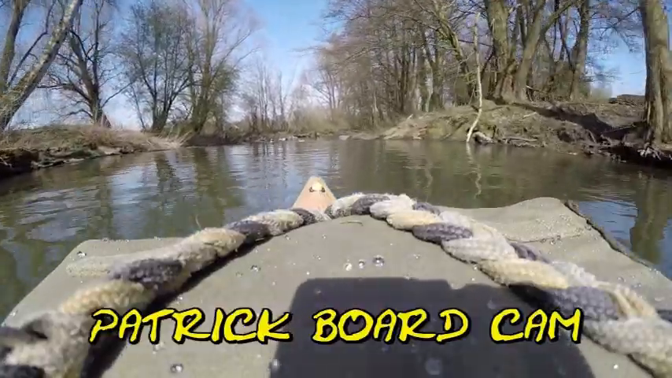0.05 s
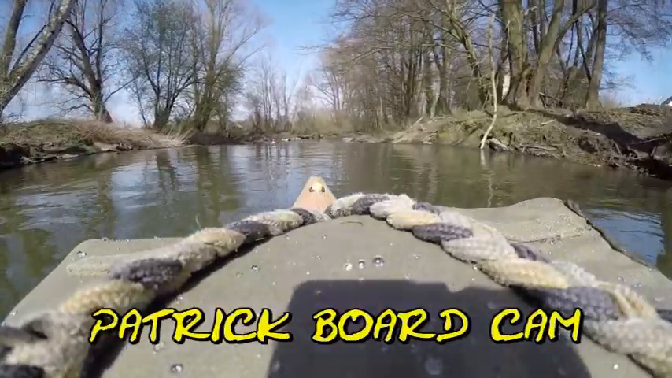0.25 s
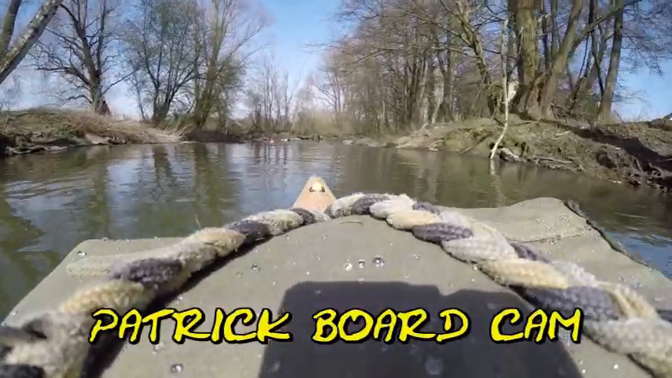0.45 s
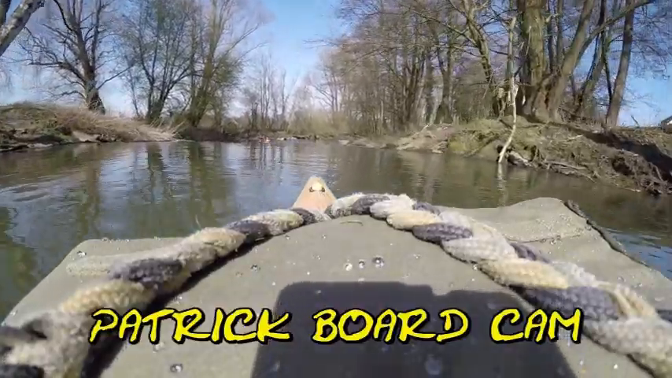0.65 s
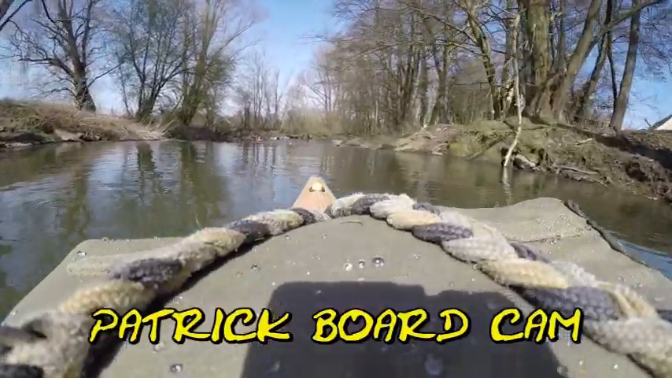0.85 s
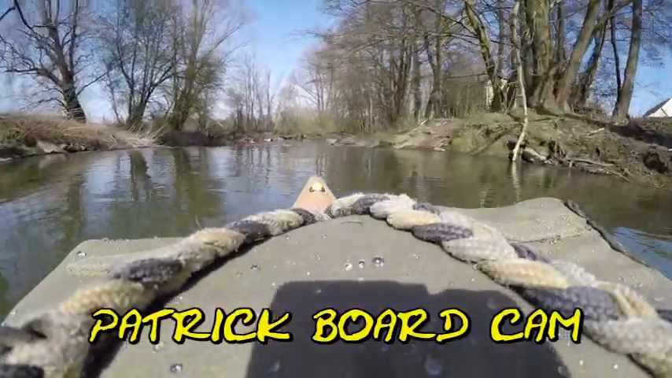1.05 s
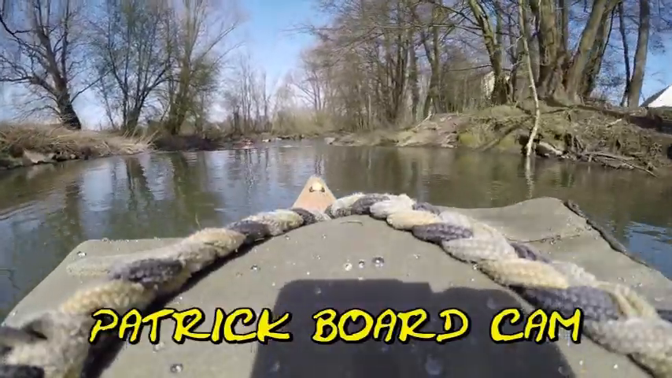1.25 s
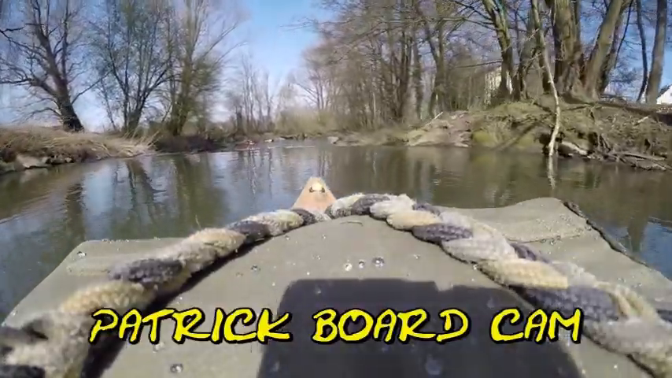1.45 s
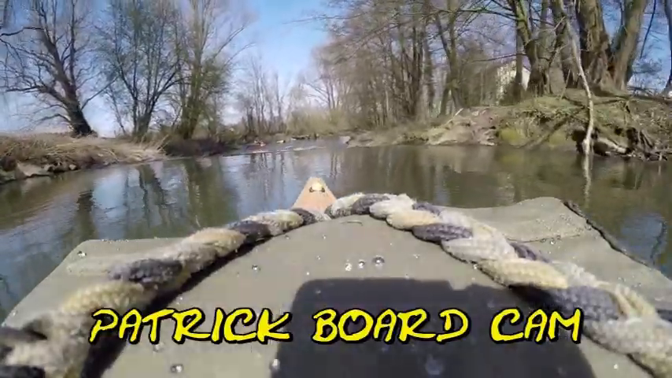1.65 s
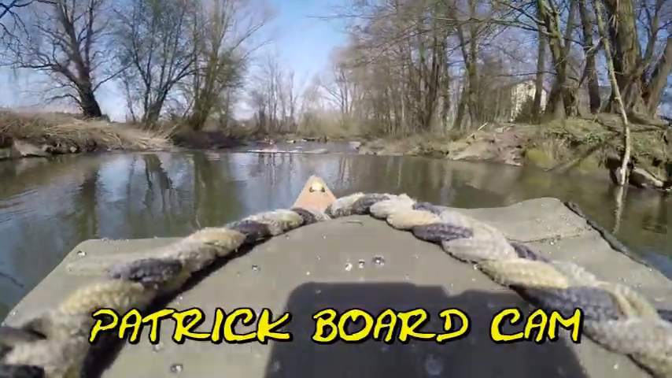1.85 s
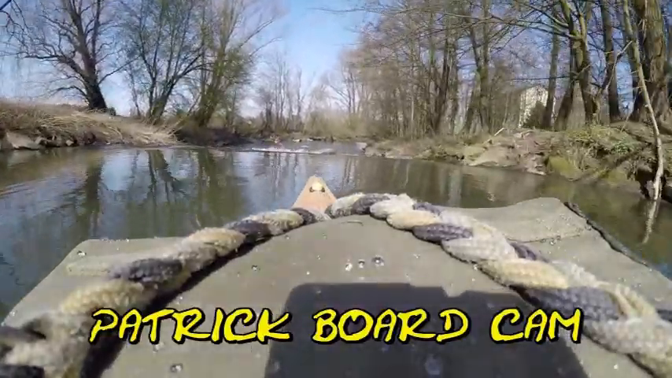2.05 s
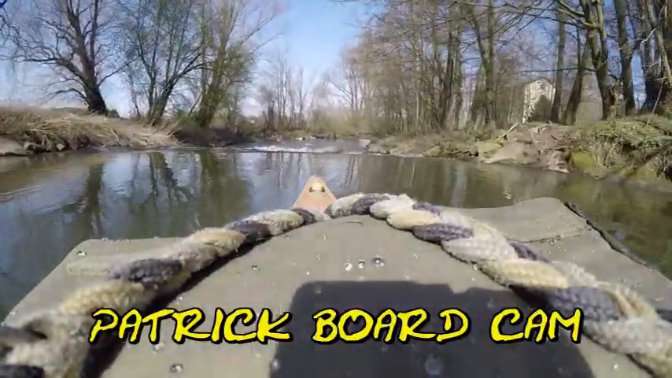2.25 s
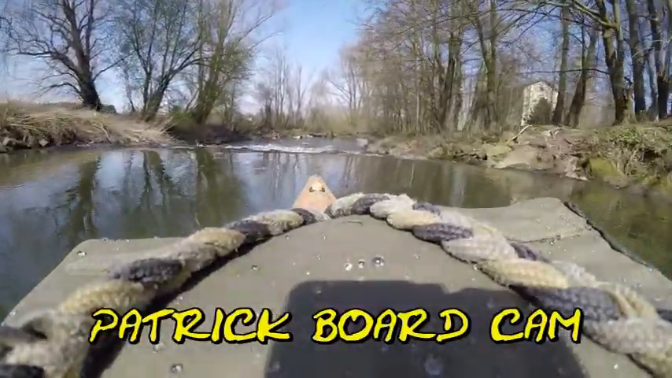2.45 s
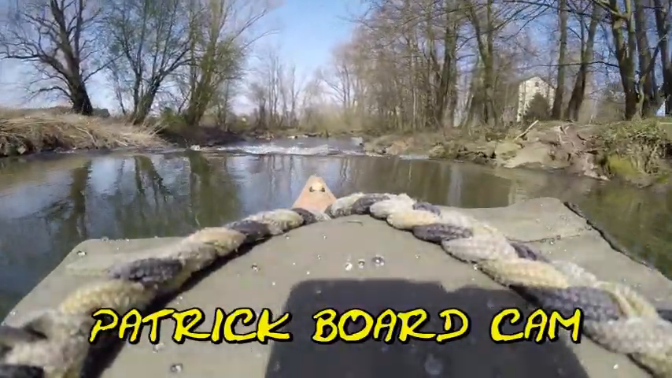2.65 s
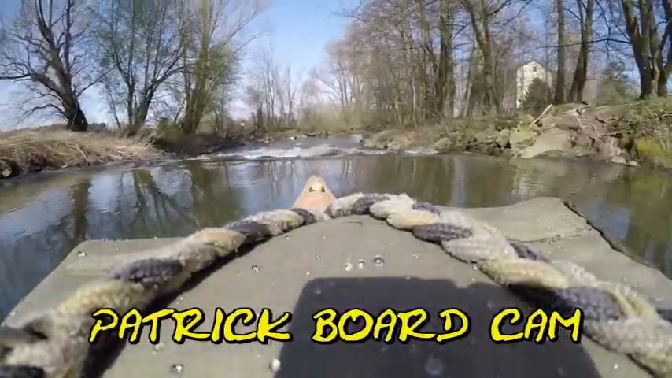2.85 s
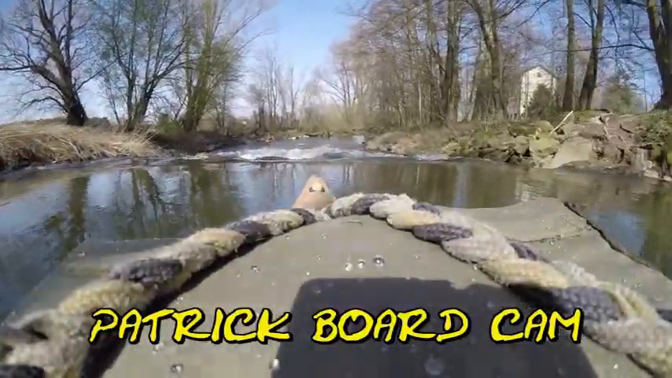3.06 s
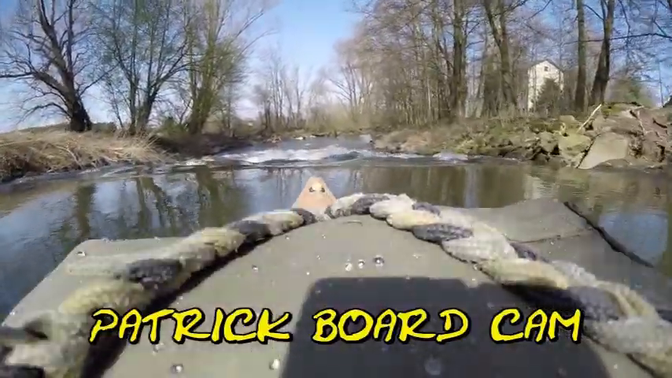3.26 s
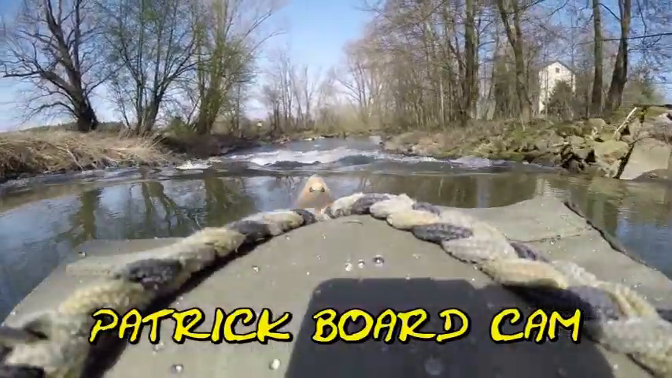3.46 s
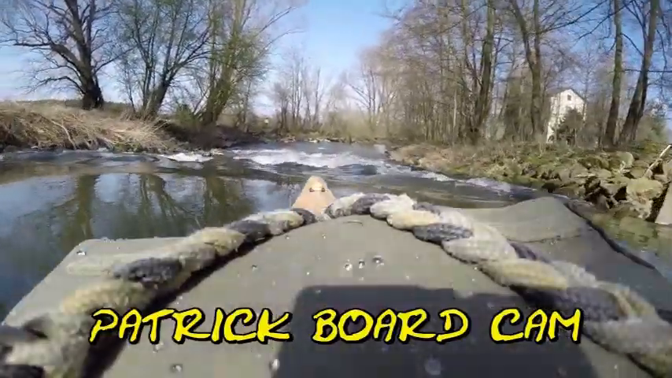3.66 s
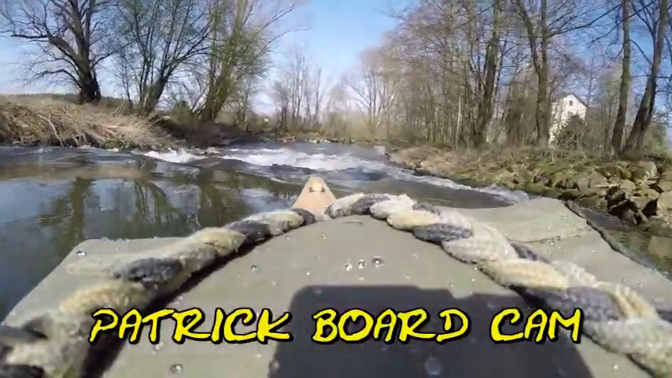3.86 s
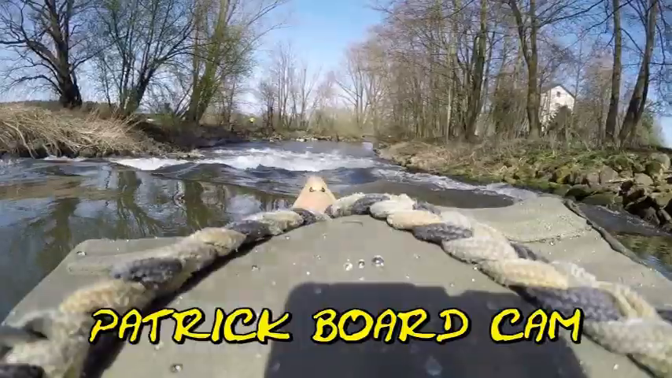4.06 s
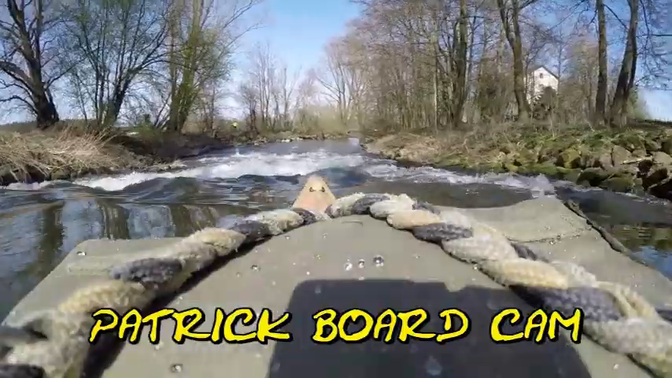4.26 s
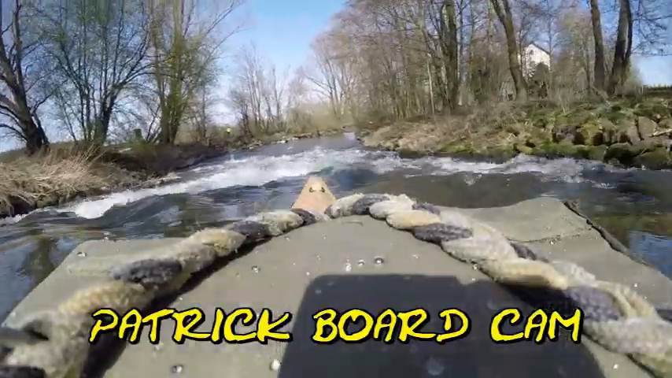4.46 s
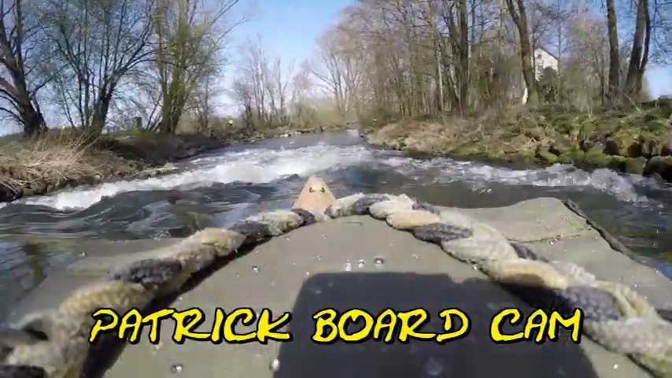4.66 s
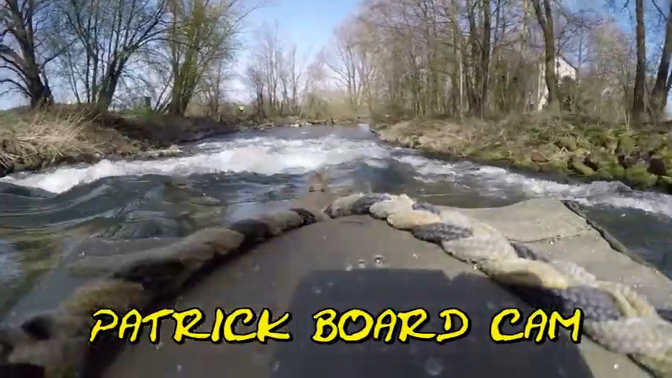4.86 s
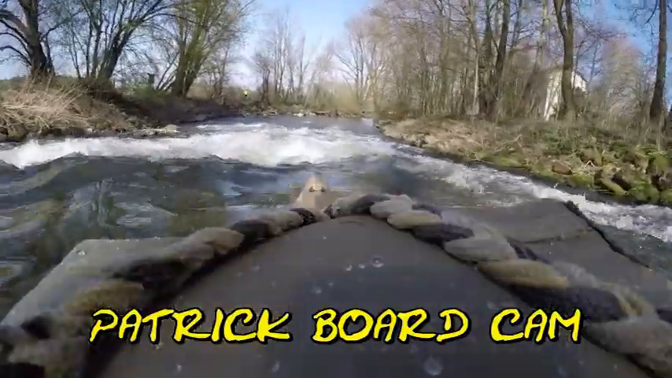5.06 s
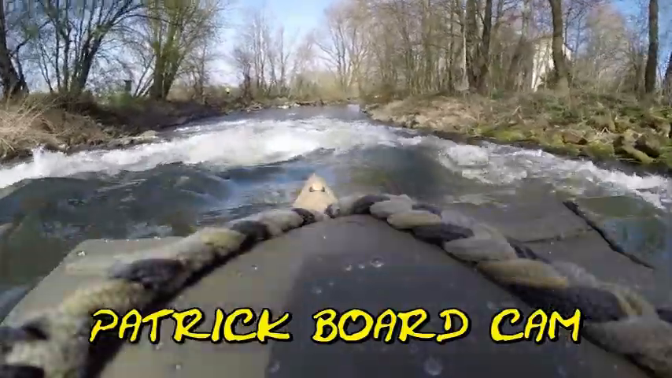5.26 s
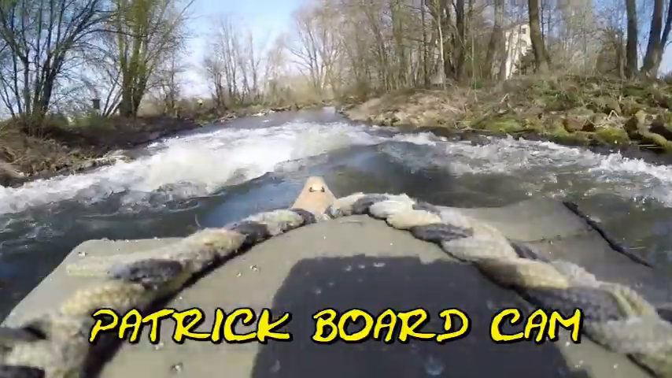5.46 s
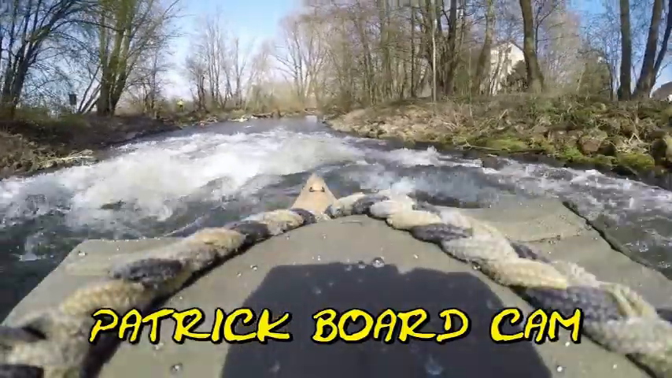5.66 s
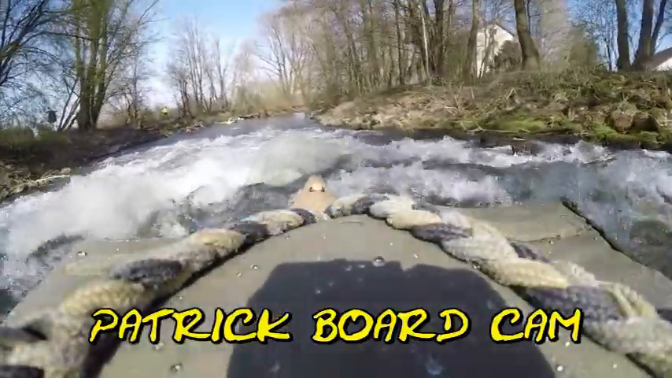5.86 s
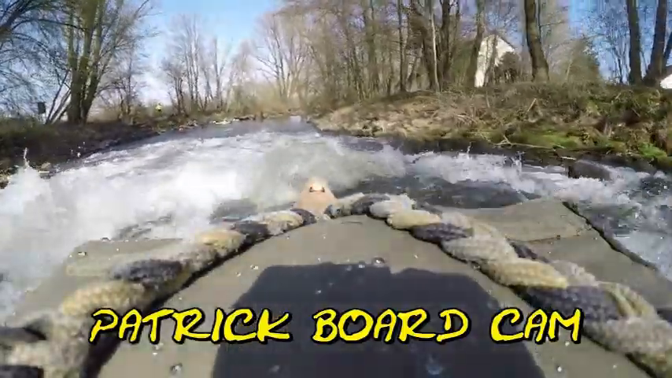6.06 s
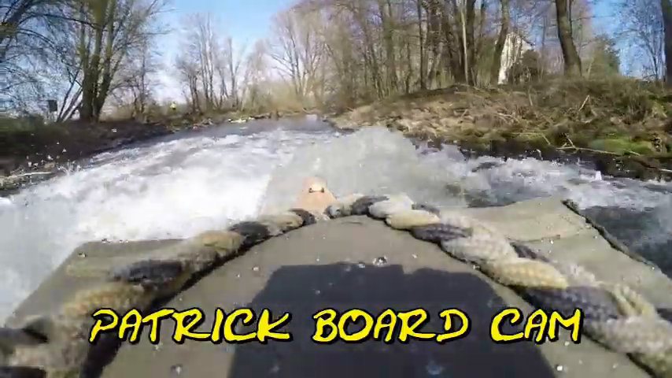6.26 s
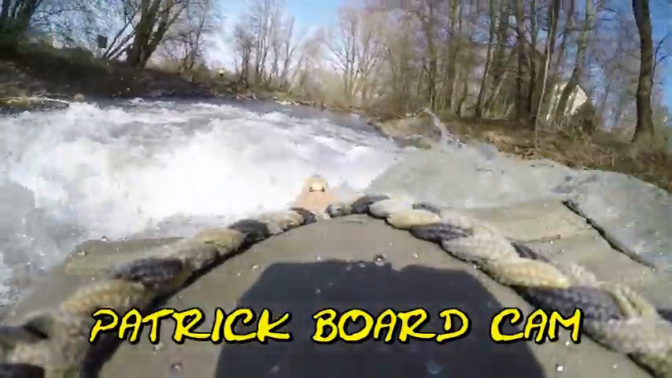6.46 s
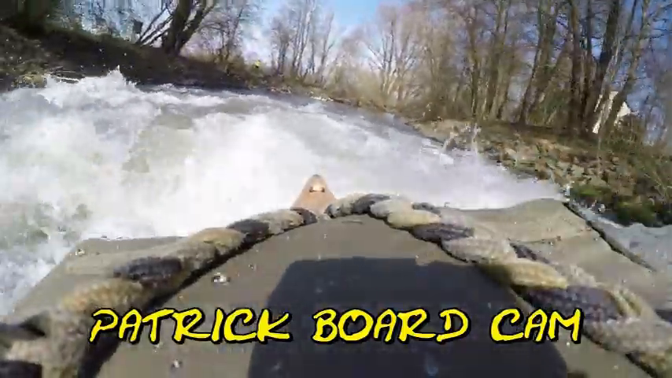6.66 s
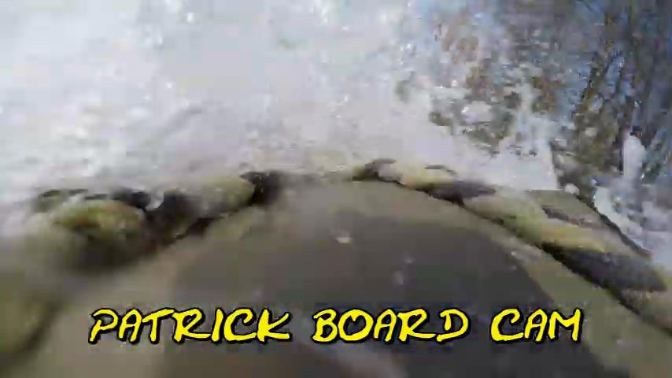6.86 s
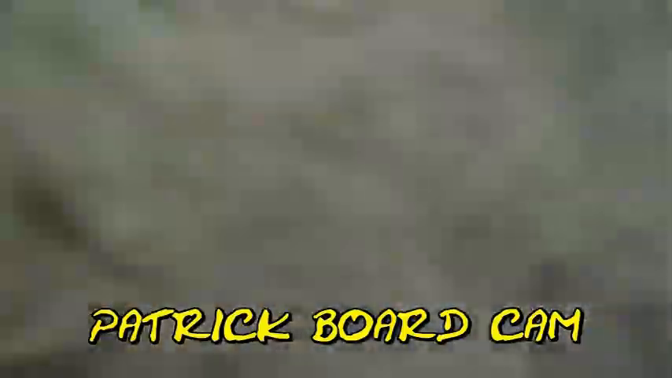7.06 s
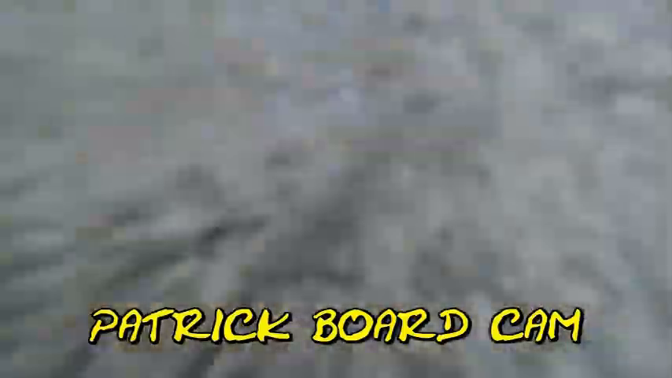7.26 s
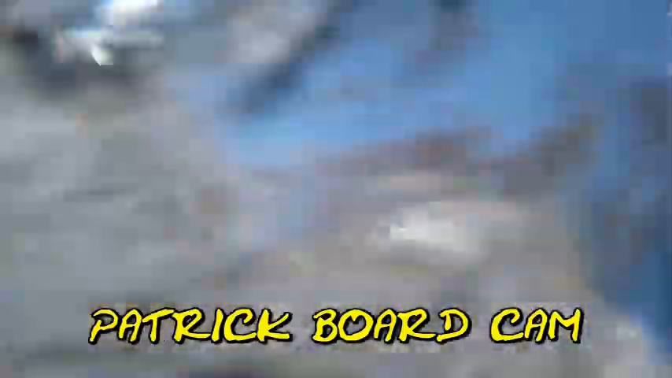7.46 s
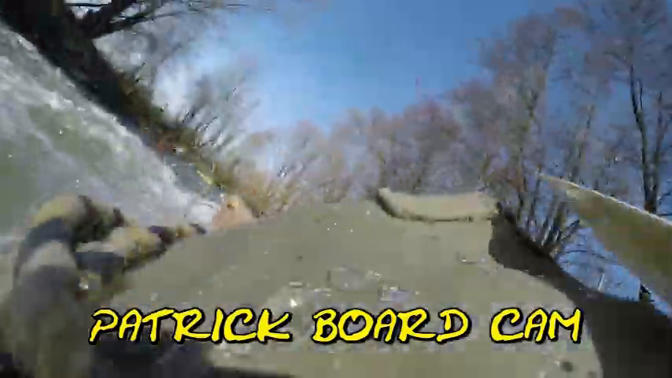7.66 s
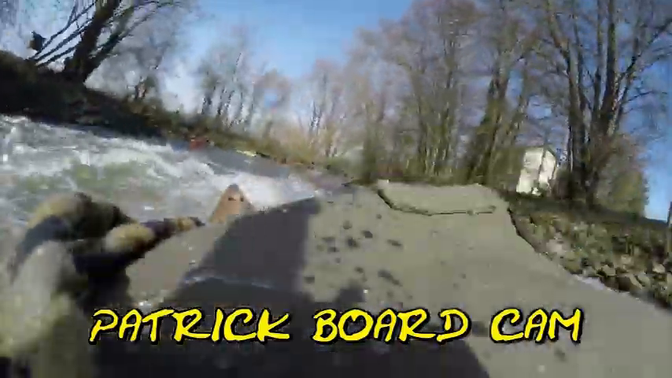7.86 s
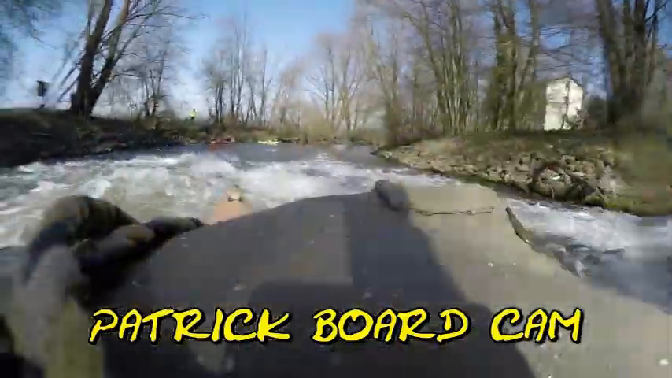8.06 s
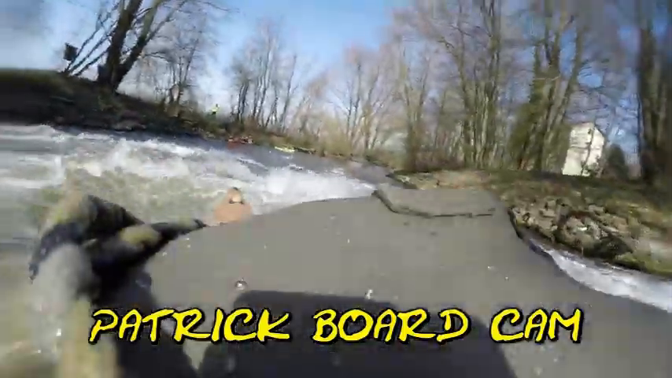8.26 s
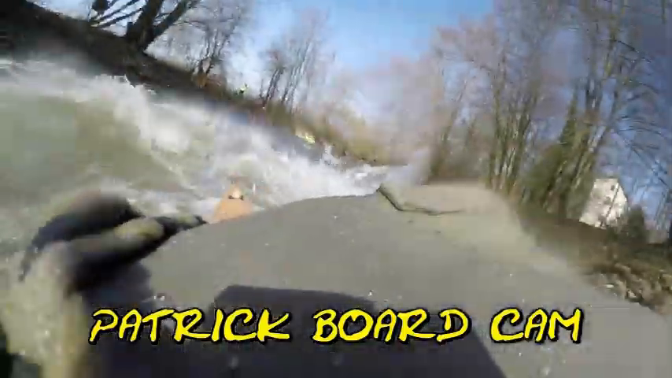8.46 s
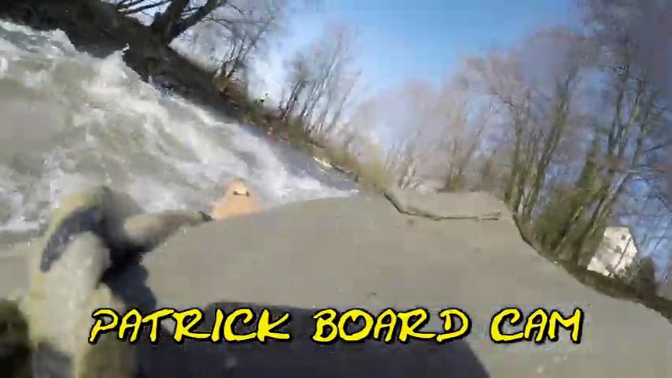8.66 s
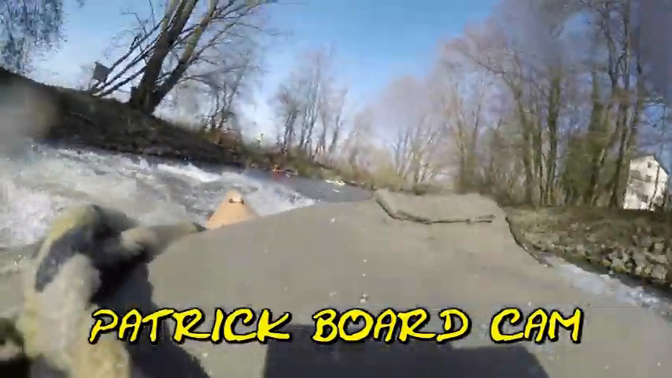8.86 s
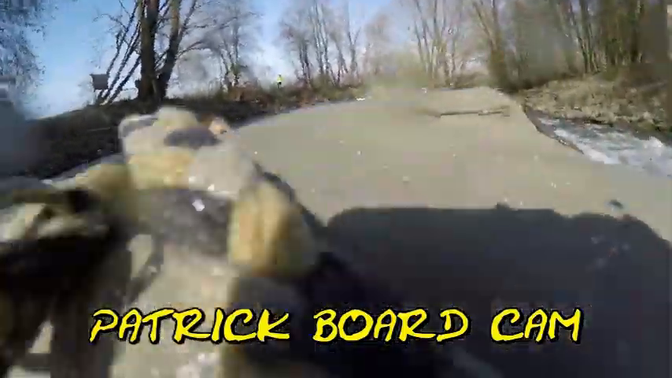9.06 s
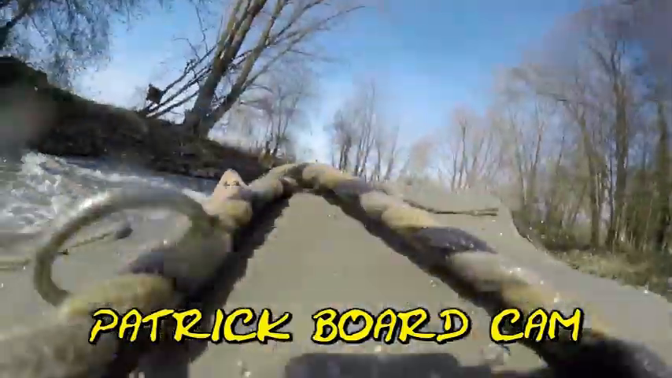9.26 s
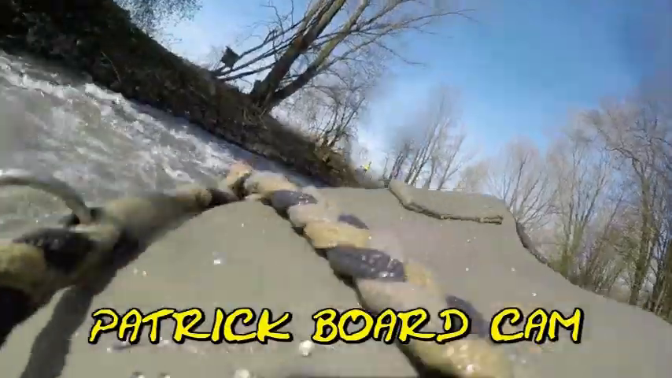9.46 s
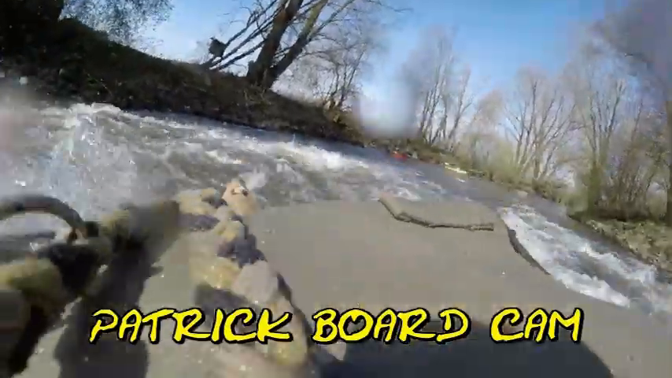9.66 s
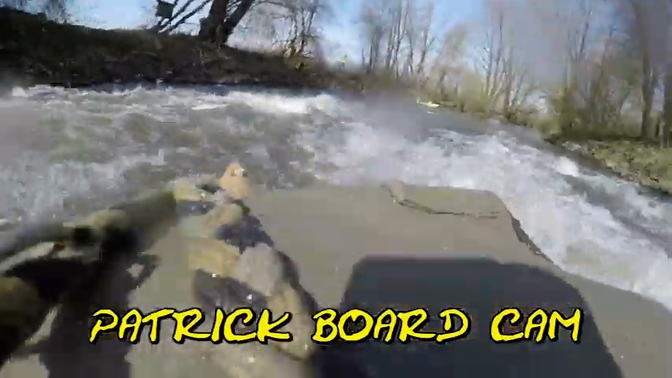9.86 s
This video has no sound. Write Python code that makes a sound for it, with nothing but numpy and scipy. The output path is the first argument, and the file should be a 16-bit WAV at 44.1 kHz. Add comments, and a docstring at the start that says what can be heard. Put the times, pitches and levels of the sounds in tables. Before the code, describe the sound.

Rushing white water grows steadily louder, a boat plunges under with bubbling foam, then surfaces to muffled river noise, heavy hull thumps and hard clacks.

```python
"""A river weir roars and hisses, louder as a kayak glides up to it and drops into the white water.
Heard from a small camera in a waterproof case on the deck: merged bubbles make the roar, ripples drum on
the hollow hull, then a wave breaks over the bow and buries the case in foam noise and bubble swarms.
With the case wet the river is muffled by a film that drains; waves thump the hull as soft low notes
and deck gear knocks against the camera mount, ringing its modes."""
import sys
import numpy as np
from scipy import signal
from scipy.fft import rfft, irfft
from scipy.io import wavfile
from scipy.ndimage import uniform_filter1d, map_coordinates

SR = 44100
rng = np.random.default_rng(int(sys.argv[2]) if len(sys.argv) > 2 else 0)


def digitize_waveform(pressure):
    """Quantize a signal to 16-bit integers and store it at the path in sys.argv[1].

    Rows of a 2-D input are taken as channels; values are limited to [-1, 1].
    """
    field = np.atleast_2d(pressure).T
    bounded = np.clip(field, -1, 1)
    quanta = np.round(bounded * 32767).astype(np.int16)
    wavfile.write(sys.argv[1], SR, quanta)


N = 436590
TIME = np.arange(N) / SR
TOP_HZ = 15200  # upper edge of the camera's sound

# fine spray spectrum: pitch_hz, level_db (per Hz, relative)
HISS = [(3500, 7.5), (6500, 2), (8000, -4), (10000, -3.5), (12000, -8), (15000, -7)]
# broken water spectrum: pitch_hz, level_db (per Hz, relative)
SPLASH = [(330, -17.5), (500, 0), (900, 6), (1400, 5.5), (2100, 11.5), (3000, 4.5), (4500, -10),
          (7000, -25.5)]
# modes of mount and case: pitch_hz, level_db, undamped t60_s
MOUNT = [(529, -10, 0.15), (884, -4, 0.53), (1060, 2.5, 0.023), (1661, -1.5, 0.28), (2194, 1, 0.044),
         (2690, -1, 0.086), (3220, -5.5, 0.079), (3910, -4.5, 0.05), (6320, -2.5, 0.045)]

# bow under, bow up again
DIVE_S, SURFACE_S = 7.0, 7.7
SURGE_RISE_S = 0.01
# onset and fade of the chattering gear and the falling drips
CLATTER_S, CLATTER_DECAY_S = 9.26, 0.3


def undb(db):
    """Decibels to gain."""
    return 10 ** (np.asarray(db) / 20)


def unit(x):
    """Scale to rms 1."""
    return x / np.sqrt(np.mean(x ** 2))


def curves(table):
    """Columns of a table, joined by straight lines in time."""
    s, *columns = np.transpose(table)
    return [np.interp(TIME, s, c) for c in columns]


def add(out, s, x):
    """Mix a short sound in at time s."""
    i = int(np.clip(s * SR, 0, N - 1))
    out[i:i + len(x)] += x[:N - i]


def walk(rate_hz):
    """Smooth random curve with spread near 1."""
    k = int(SR / rate_hz)
    steps = np.repeat(rng.standard_normal(N // k + 1), k)
    return 1.3 * uniform_filter1d(steps, k)[:N]


def swell(s, rise, hold, decay):
    """Envelope that rises to 1 at time s, holds and dies away."""
    return np.clip(1 + (TIME - s) / rise, 0, 1) * np.exp(-np.maximum(TIME - s - hold, 0) / decay)


def together(levels):
    """Joint level of unrelated sounds."""
    return np.sqrt(sum(level ** 2 for level in levels))


def colour(x, points):
    """Filter x by (Hz, dB) points, 24 dB per octave down beyond the ends; rms 1."""
    hz, db = np.transpose(points)
    octave = np.log2(np.maximum(np.fft.rfftfreq(N, 1 / SR), 1))
    beyond = np.abs(octave - np.clip(octave, np.log2(hz[0]), np.log2(hz[-1])))
    gain_db = np.interp(octave, np.log2(hz), db) - 24 * beyond
    return unit(irfft(rfft(x) * undb(gain_db), N))


def band(x, lo_hz, hi_hz):
    """Gentle band-pass."""
    edges_hz = [lo_hz, min(hi_hz, .45 * SR)]
    return signal.sosfilt(signal.butter(2, edges_hz, "band", fs=SR, output="sos"), x)


def bubble(hz, cycles, glide=0.23):
    """Ringing air pocket that rises in pitch as it dies away."""
    age = np.linspace(0, 1, int(cycles * SR / hz) + 2)
    return np.sin(2 * np.pi * cycles * age * (1 + glide * age / 2)) * np.exp(-np.log(300) * age)


def bubbles(start, end, count, lo_hz, hi_hz, cycles, spread_db):
    """Swarm of random bubbles, low ones weaker; spread makes a few stand out (or drop, if negative)."""
    out = np.zeros(N)
    for when, pitch, life, luck in rng.random((count, 4)):
        hz = lo_hz * (hi_hz / lo_hz) ** pitch
        size = undb(-spread_db * np.log(1 - .99 * luck))
        add(out, start + when * (end - start), size * hz / hi_hz * bubble(hz, cycles * (.5 + life)))
    return unit(out) * np.sqrt((end - start) / TIME[-1])  # rms 1 while it lasts


def weir():
    """Countless distant bubbles merge into a slightly fluttering roar; hiss grows as the foam nears."""
    # roar spectrum: pitch_hz, level_db (per Hz, relative)
    roar_spectrum = [(200, 1.5), (260, -6), (350, -2.5), (520, -1.5), (700, -8), (870, -4), (1300, -6),
                     (1650, -2.5), (2450, -1), (2800, -9.5), (3100, -7), (3450, -23), (5000, -23)]
    # steady drift past the foot of the weir
    drift_m_s, foot_s, nearest_m = 2.5, 7.283, 0.57
    # level at the nearest point, loss per doubling of distance
    roar_near_db, roar_fall_db = -45, 4.5
    hiss_near_db, hiss_fall_db = -58, 5
    distance_m = np.hypot(drift_m_s * (TIME - foot_s), nearest_m)
    doublings = np.log2(distance_m / nearest_m)
    roar_db = roar_near_db - roar_fall_db * doublings
    hiss_db = hiss_near_db - hiss_fall_db * doublings
    swarm = bubbles(0, TIME[-1], count=7000, lo_hz=409.4, hi_hz=9560, cycles=22.5, spread_db=-1.5)
    froth = rng.standard_normal(N) + .5 * swarm
    flutter_db = .6 * walk(22)
    roar = colour(froth, roar_spectrum) * undb(roar_db)
    hiss = colour(froth, HISS) * undb(hiss_db)
    return (roar + hiss) * undb(flutter_db)


def film(x):
    """Water on the case muffles the river, treble most; it builds up under the wave and drains slowly."""
    soak_s, film_db, drain_db_per_s = 0.22, 19, 5.5
    edge_hz, low_share = 1200, 0.67  # lows take only this share of the loss
    soaked = np.clip(1 + (TIME - SURFACE_S) / soak_s, 0, 1)
    drained_db = drain_db_per_s * np.maximum(TIME - SURFACE_S, 0)
    loss_db = soaked * np.maximum(film_db - drained_db, 0)
    low = signal.sosfiltfilt(signal.butter(2, edge_hz, fs=SR, output="sos"), x)
    return low * undb(-low_share * loss_db) + (x - low) * undb(-loss_db)


def case(x):
    """Walls of the case resonate in a few narrow bands."""
    # resonances: pitch_hz, width_hz, boost_db
    resonances = [(853, 190, 2.5), (1360, 260, -2), (1615, 140, 1.5), (2514, 200, 3.5), (4450, 300, 2.5),
                  (5630, 120, 6.5)]
    out = x
    for hz, width_hz, boost_db in resonances:
        out = out + (undb(boost_db) - 1) * signal.lfilter(*signal.iirpeak(hz, hz / width_hz, fs=SR), x)
    return out


def breaking_wave():
    """Uneven sheets of foam: gurgling bubbles below, fizz above that thins into lone crackles."""
    # surges over the deck: crest_s, level_db, decay_s, fine spray relative_db
    surges = [(7.136, -32, 0.02, -10.5), (7.12, -37.5, 0.19, -3.5), (7.445, -42.5, 0.11, -9.5)]
    water = together(undb(db) * swell(s, SURGE_RISE_S, 0, decay_s) for s, db, decay_s, _ in surges)
    spray = together(undb(db + spray_db) * swell(s, SURGE_RISE_S, 0, decay_s)
                     for s, db, decay_s, spray_db in surges)
    lasts = np.sqrt((SURFACE_S - DIVE_S) / TIME[-1])  # restores rms 1 within the dive
    thinned = np.clip((TIME - DIVE_S) / (SURFACE_S - DIVE_S), 0, 1)
    large = bubbles(DIVE_S, SURFACE_S, count=420, lo_hz=404, hi_hz=5650, cycles=26, spread_db=3.0)
    small = bubbles(DIVE_S, SURFACE_S, count=420, lo_hz=3510, hi_hz=14300, cycles=24, spread_db=3.0)
    gurgle = lasts * colour(large, SPLASH)
    crackle = lasts * colour(small, HISS)
    foam = colour(rng.standard_normal(N), SPLASH)
    fizz = colour(rng.standard_normal(N), HISS)
    lumps_db = 2.6 * walk(55)
    body = water * (gurgle + undb(-7.5) * foam)
    top = spray * (undb(5.5) * thinned * crackle + undb(4) * (1 - thinned) * fizz)
    fade = np.clip((SURFACE_S - TIME) / 0.044, 0, 1)
    return (body + top) * fade * undb(lumps_db)


def crests():
    """Seething of a foaming crest grows as it nears and dies once the bow has met it."""
    # crests: meeting_s, level_db, growth_db_per_s
    crest_table = [(7.02, -47.5, 12), (8.87, -61.5, 56), (9.2, -59.5, 82)]
    decay_s, spray_db = .06, -9
    near = together(undb(db - growth * np.maximum(s - TIME, 0))
                    * np.exp(-np.maximum(TIME - s, 0) / decay_s) for s, db, growth in crest_table)
    foam = colour(rng.standard_normal(N), SPLASH)
    spray = colour(rng.standard_normal(N), HISS)
    return (foam + undb(spray_db) * spray) * near


def thumps():
    """Soft push of water swells and fades as a low hull note; the lowest carry a dull gurgle."""
    # slaps on the hull: crest_s, peak_db, pitch_hz, half_length_s (to half amplitude)
    slaps = [(.56, -43.5, 143, 0.0093), (1.882, -54.5, 197, 0.014), (1.968, -46, 157, 0.01),
             (2.027, -55, 198, 0.034), (3.297, -44, 144, 0.012), (3.603, -46.5, 162, 0.013),
             (3.687, -40, 143, 0.034), (4.66, -46, 151, 0.015), (5.513, -39.5, 128, 0.0042),
             (6.047, -42, 159, .015), (6.96, -24.5, 125.7, 0.019), (7.142, -20, 78.6, 0.0068),
             (7.744, -25, 77.4, 0.014), (7.843, -30, 99, 0.0043), (8.198, -31.5, 111, 0.0047),
             (8.828, -14.5, 78, 0.0069), (8.887, -22.5, 89, 0.0047), (8.955, -31.5, 95, 0.005),
             (9.189, -16, 98.3, 0.008), (9.224, -23, 114, .004), (9.359, -25, 77.4, 0.01),
             (9.412, -28.5, 92, 0.0099), (9.605, -30.5, 108, 0.018), (9.778, -28, 66.6, 0.015)]
    out = np.zeros(N)
    for s, db, hz, half_s in slaps:
        t = np.arange(-4 * half_s, 4 * half_s, 1 / SR)
        gurgle = unit(band(rng.standard_normal(len(t)), 190, 320))
        note = np.sin(2 * np.pi * hz * t) + undb(-24.5) * (hz < 125) * gurgle
        add(out, s + t[0], undb(db) * note * .5 ** ((t / half_s) ** 2))
    return out


def knocks():
    """A knock rings the mount, with a short rough crack of tiny slips on top; harder ones favour treble."""
    # wet gear on the mount: start_s, level_db (loudest 10 ms), hardness_db_per_octave,
    # spot_hz (note of the struck spot), ring_share (0-1, left by the contact)
    contacts = [(0.539, -50.5, -8, 900, .27), (7.723, -38.5, -3, 770, 0.36), (7.828, -44, -2, 2450, 0.3),
                (8.887, -38, 0, 3760, 0.72), (9.18, -38.5, -1, 2250, .08), (9.235, -34.5, -0.5, 2640, .98),
                (9.256, -40, -4.5, 2200, 0.06), (9.353, -44, -2, 1000, 0.16),
                (9.397, -40.5, -10, 1640, 0.4), (9.534, -47.5, -6, 510, 0.77), (9.776, -44, 0, 514, 0.4)]
    # water on the case: time_s, share of the pitch lost (held flat outside)
    wet = [(7.0, 0.013), (7.7, 0.15), (8.9, .032), (9.2, 0.014)]
    contact_s, spot_db, spot_octaves = 0.0067, 8, 0.23
    low_t60_s = 0.1  # longest ring of the low modes
    out, t = np.zeros(N), np.arange(SR // 3) / SR
    octave = np.log2(np.maximum(np.fft.rfftfreq(len(t), 1 / SR), 1))
    for s, db, hardness_db, spot_hz, ring_share in contacts:
        sag = np.interp(s, *np.transpose(wet))
        bent_s = np.cumsum(1 - sag * (1 - np.exp(-t / contact_s))) / SR  # slowed time drags pitch down
        ring = 0
        phases = 2 * np.pi * rng.random(len(MOUNT))
        for (hz, mode_db, t60_s), phase in zip(MOUNT, phases):
            life_s = t60_s * ring_share
            if hz < 1000:
                life_s = min(life_s, low_t60_s)
            ring = ring + undb(mode_db - 60 * t / life_s) * np.sin(2 * np.pi * hz * bent_s + phase)
        slips = case(band(rng.standard_normal(len(t)) ** 3, 530, 3130)) * np.exp(-t / contact_s)
        hit = ring * np.minimum(t / 0.0011, 1) + undb(2.0) * slips
        tone_db = hardness_db * np.clip(octave, np.log2(850), np.log2(7000))
        tone_db = tone_db + spot_db * np.exp(-((octave - np.log2(spot_hz)) / spot_octaves) ** 2)
        hit = irfft(rfft(hit) * undb(tone_db), len(t)) * (1 - t / t[-1])
        loudest = np.sqrt(uniform_filter1d(hit ** 2, SR // 100).max())
        add(out, s, undb(db) * hit / loudest)
    return out


def clatter():
    """Loose gear chatters on the mount in uneven little ticks, damping its modes as it touches."""
    level_db, ring_share = -58, 0.3
    ticks = rng.standard_normal(N) ** 5 * undb(5 * walk(90))
    ring = 0
    for hz, db, t60_s in MOUNT:
        q = np.pi * hz * t60_s * ring_share / np.log(1000)
        ring = ring + undb(db) * signal.lfilter(*signal.iirpeak(hz, q, fs=SR), ticks)
    return unit(band(ring, 650, 4000)) * undb(level_db) * swell(CLATTER_S, SURGE_RISE_S, 0, CLATTER_DECAY_S)


def rope():
    """Wet rope sticks and slips over the deck: a rasp through resonances that waver as water runs off."""
    # drag curve: time_s, level_db
    drag = [(7.83, -63), (7.865, -50.5), (7.895, -58), (7.95, -50.5), (8.0, -68)]
    # rubbed resonances: pitch_hz, width_hz, level_db
    rubbed = [(830, 180, -4.5), (1516, 190, 1.5), (2420, 230, 0), (3720, 280, -12.5)]
    slips, rasp = rng.standard_normal(N) ** 3, 0
    for hz, width_hz, db in rubbed:
        peak = signal.iirpeak(hz, hz / width_hz, fs=SR)
        rasp = rasp + undb(db) * signal.lfilter(*peak, signal.lfilter(*peak, slips))
    wavering = np.cumsum(1 + .025 * walk(40))  # uneven reading speed
    rasp = map_coordinates(rasp, [wavering], mode="mirror")
    return unit(rasp) * undb(curves(drag)[0]) * (TIME > drag[0][0]) * (TIME < drag[-1][0])


def gulps():
    """Single large bubbles pinch off against the submerged case."""
    # bubbles under the wave: start_s, peak_db, pitch_hz
    pinches = [(7.134, -25, 327), (7.184, -33, 890), (7.195, -27.5, 600), (7.222, -28, 1730),
               (7.486, -36, 804), (7.628, -36, 1080)]
    out = np.zeros(N)
    for s, db, hz in pinches:
        add(out, s, undb(db) * bubble(hz, cycles=8.1))
    return out


def drops():
    """A drop ticks on the case and traps two briefly ringing bubbles, one large and one small."""
    # drops: start_s, bubble_db, bubble_hz, tick relative_db (before halving and band-pass)
    hits = [(.7715, -32.5, 2490, -4.5), (.781, -41, 2450, -2), (.788, -43, 2340, 1), (3.332, -61, 5600, 14),
            (7.067, -19, 2130, 3), (7.091, -23, 2390, 2), (7.11, -25.5, 2310, 7), (7.1302, -20, 4300, 9.5),
            (7.3954, -30.5, 1890, -4), (7.515, -37.5, 5370, -13), (7.673, -36, 5200, -18),
            (7.685, -40.5, 2350, -12), (7.9722, -40.5, 2080, -8), (8.05, -49, 12900, -2),
            (9.3113, -39.5, 2040, -1), (9.469, -48.5, 6200, -14), (9.73, -46, 2180, -4)]
    out, t = np.zeros(N), np.arange(SR // 30) / SR
    for s, db, hz, tick_db in hits:
        tick = band(rng.standard_normal(len(t)), 1000, 7700) * np.exp(-t / 0.003)
        add(out, s, undb(db + tick_db) / 2 * tick)
        add(out, s, undb(db) * bubble(hz, cycles=48, glide=0.05))
        add(out, s, undb(db - 6.0) * bubble(1.405 * hz, cycles=39) * (1.45 * hz < TOP_HZ))
    return out


def drips():
    """Water thrown up by the last wave spatters back onto the case and dwindles."""
    spatter = bubbles(CLATTER_S, TIME[-1], count=70, lo_hz=1300, hi_hz=6080, cycles=23, spread_db=4.5)
    return spatter * undb(-58.0) * swell(CLATTER_S, SURGE_RISE_S, 0, CLATTER_DECAY_S)


def glugs():
    """Big pockets of air that wobble briefly in the surging water."""
    return bubbles(0, TIME[-1], count=4000, lo_hz=228, hi_hz=624, cycles=6.6, spread_db=-1.5)


def sloshes():
    """Wavelets break on the side in quickly fading patters of bubbles; stray ones plop in between."""
    # bursts: crest_s, level_db, decay_s, air pockets relative_db
    burst_table = [(1.92, -60.5, 0.087, -11), (3.998, -54.5, 0.024, -22), (7.092, -45, 0.0088, 3),
                   (7.133, -38.5, 0.0087, 0), (7.153, -36, .024, -16), (7.181, -39.5, 0.0099, 6),
                   (7.223, -44.5, 0.013, -0.5), (7.328, -39, 0.021, -19), (7.461, -40, 0.012, -10),
                   (7.989, -53, 0.0067, 8), (8.82, -52, 0.048, -3.5), (9.222, -50, 0.14, -3),
                   (9.63, -62, 0.12, 0)]
    # patter spectrum: pitch_hz, level_db (per Hz, relative)
    patter_spectrum = [(280, -10), (900, -0.5), (2300, -1), (4500, -14.5)]
    swarm = bubbles(0, TIME[-1], count=9000, lo_hz=406, hi_hz=4280, cycles=14.0, spread_db=2.0)
    patter = colour(swarm, patter_spectrum)
    bursts = [(undb(db) * swell(s, 0.008, 0, decay_s), glug_db) for s, db, decay_s, glug_db in burst_table]
    wash = together(burst for burst, _ in bursts)
    pockets = together(burst * undb(glug_db) for burst, glug_db in bursts)
    plops = bubbles(0, TIME[-1], count=90, lo_hz=440.0, hi_hz=1794, cycles=46, spread_db=2.0)
    return patter * wash + glugs() * pockets + undb(-80.5) * plops


def hull():
    """Ripples keep the hollow hull drumming; waves, eddies and air shake the deck."""
    # spectra: pitch_hz, level_db (per Hz, relative)
    drum_spectrum = [(70, -14), (110, -2.5), (145, 8), (170, -2), (215, -13.5), (330, -27)]
    buffet_spectrum = [(18, -6), (36, 2.5), (50, -5.5), (75, -2.5), (110, -10), (200, -24), (350, -37)]
    air_spectrum = [(28, 3.5), (45, -11.5), (300, -35)]
    # waves ridden through: start_s, length_s, drum_db, buffet_db
    waves = [(5.325, 0.52, -57.5, -54), (6.308, 0.18, -46.5, -46.5), (6.497, 0.45, -42, -43.5),
             (6.946, 0.052, -30, -27.5), (7.04, 0.15, -43, -29), (7.46, 0.51, -61, -46),
             (8.825, 0.12, -51, -41.5), (9.156, 0.15, -45.5, -31.5), (9.357, 0.49, -57, -36.5)]
    rise_s, decay_s = 0.043, 0.063
    ripple_db, air_db, eddy_db = -67, -60, -56
    rides = [(swell(s, rise_s, length_s, decay_s), drum_db, buffet_db)
             for s, length_s, drum_db, buffet_db in waves]
    drumming = together([undb(ripple_db)] + [ride * undb(db) for ride, db, _ in rides])
    eddies = undb(eddy_db) * (TIME > DIVE_S)
    shaking = together([eddies] + [ride * undb(db) for ride, _, db in rides])
    drum = colour(rng.standard_normal(N), drum_spectrum) * drumming * undb(2.7 * walk(22))
    buffet = colour(rng.standard_normal(N), buffet_spectrum) * shaking
    air = colour(rng.standard_normal(N), air_spectrum) * undb(air_db + 2.1 * walk(7.7))
    return drum + buffet + air


def scene():
    """River and wave sounds pass through the case; the rest reaches the camera directly."""
    through_case = case(film(weir()) + crests() + breaking_wave() + sloshes())
    on_case = gulps() + drops() + drips()
    through_deck = clatter() + hull() + thumps() + knocks() + rope()
    return (through_case + on_case + through_deck)[None]


def record(dry):
    """The camera rounds off the loudest peaks and cuts the top."""
    ceiling = undb(-17.5)
    held = dry / (1 + (dry / ceiling) ** 6) ** (1 / 6)
    return signal.sosfilt(signal.ellip(8, .2, 70, TOP_HZ, fs=SR, output="sos"), held)


dry = scene()
out = record(dry)
digitize_waveform(out)
```